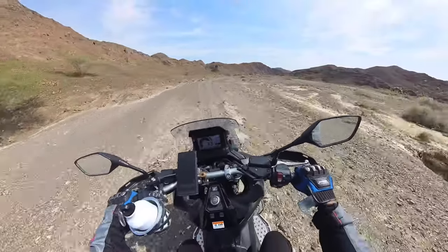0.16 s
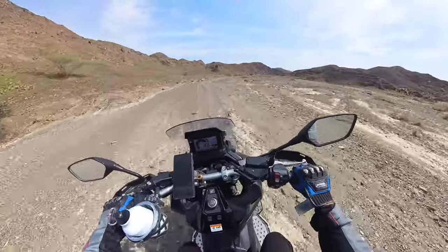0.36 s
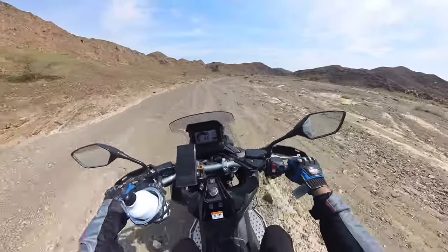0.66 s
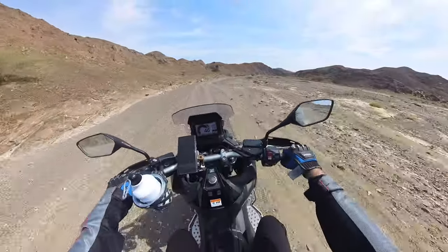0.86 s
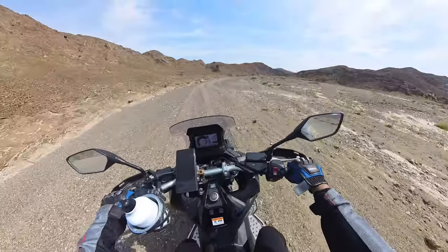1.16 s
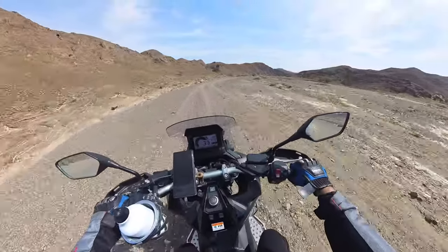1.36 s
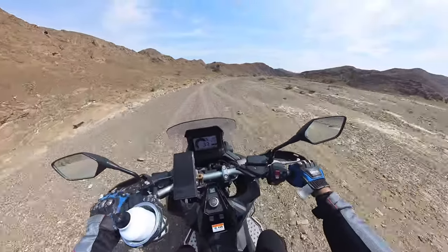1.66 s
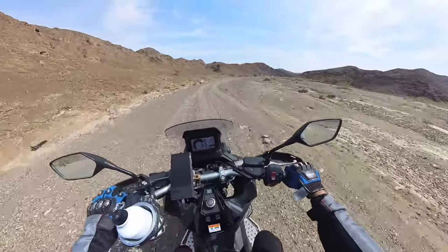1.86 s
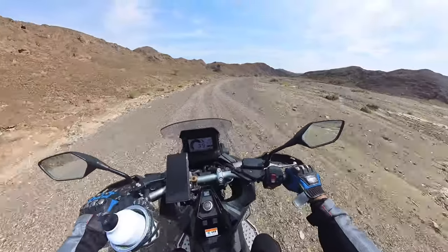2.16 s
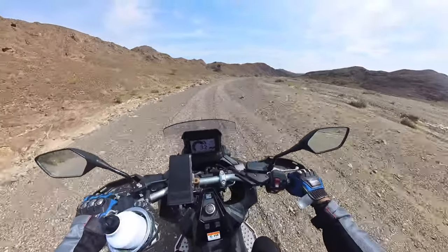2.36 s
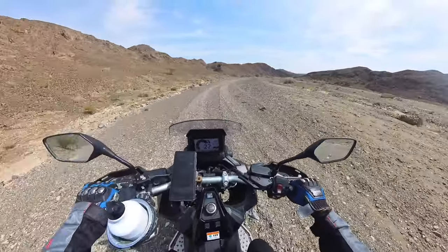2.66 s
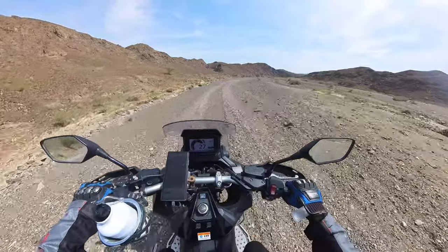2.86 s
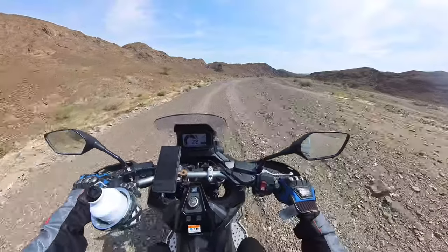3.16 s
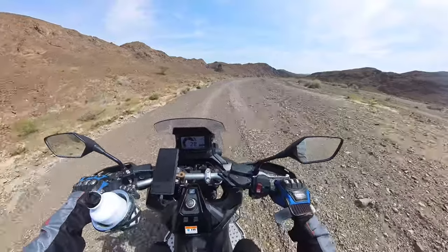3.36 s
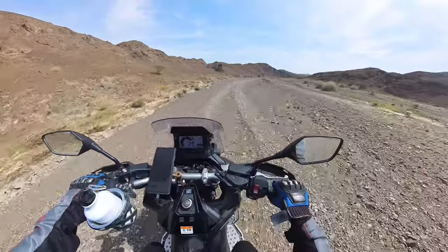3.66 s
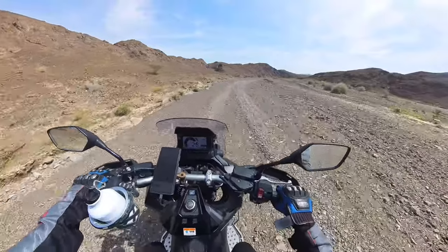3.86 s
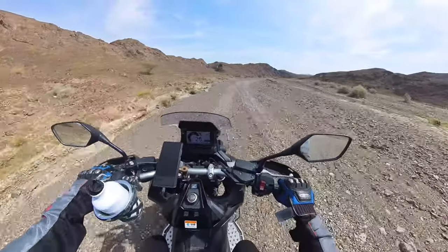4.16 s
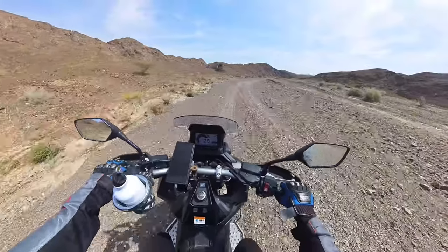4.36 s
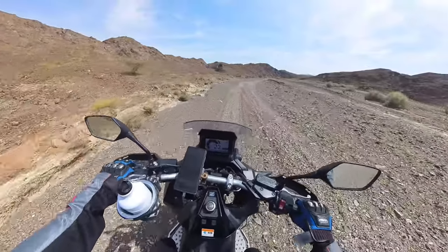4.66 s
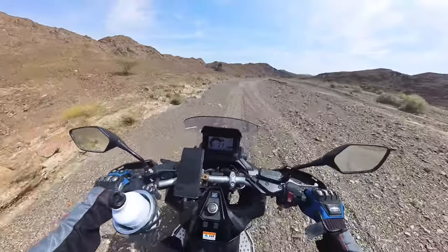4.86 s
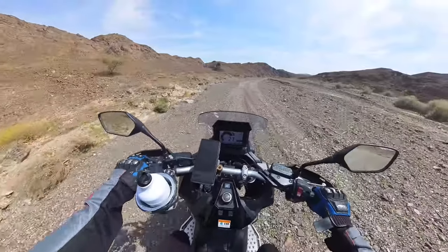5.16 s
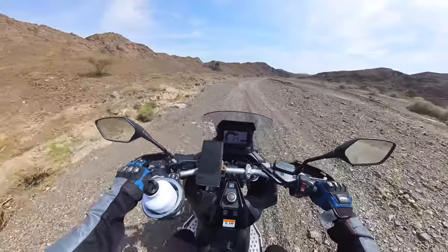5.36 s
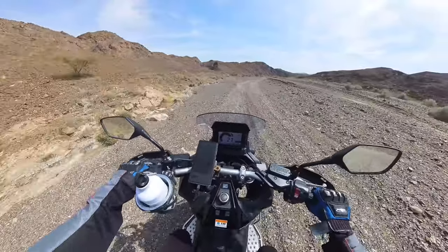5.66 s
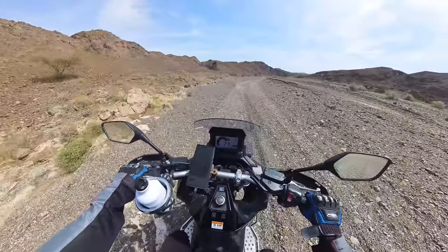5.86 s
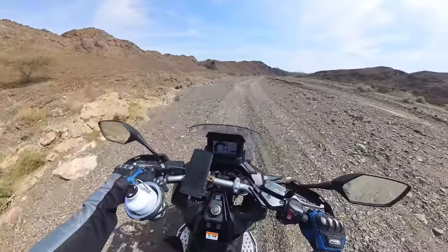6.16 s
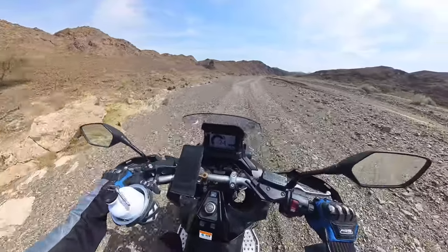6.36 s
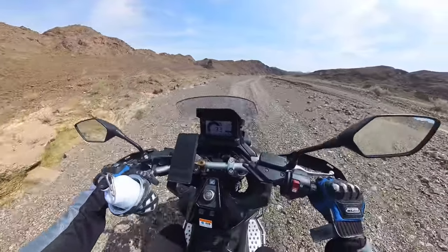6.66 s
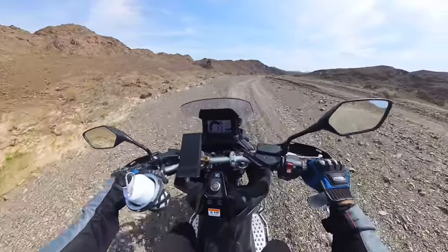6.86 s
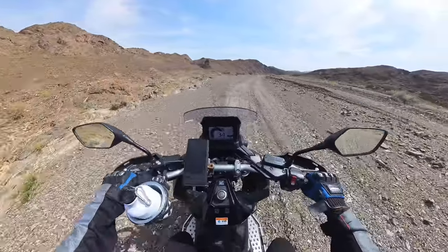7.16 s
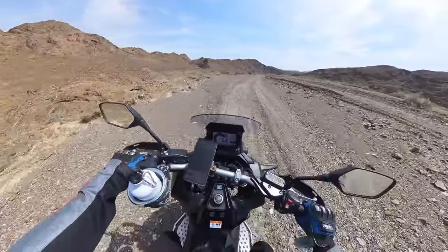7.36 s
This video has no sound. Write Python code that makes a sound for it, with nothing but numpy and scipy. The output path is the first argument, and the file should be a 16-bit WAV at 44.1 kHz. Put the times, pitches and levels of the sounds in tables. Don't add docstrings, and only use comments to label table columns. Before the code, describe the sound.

A steady chugging motorcycle engine jumps up in a short snappy surge, drops back, and gradually slows to a loping, near-idle throb while wind and tyre grind fade. A few small stones knock the underside. Then it revs again with a fuller exhaust ring, gravelly roar and chassis rattles, and slackens at the end. One close, dry outdoor microphone on the rider, bass-heavy and gently distorted.

```python
import sys
import numpy as np
from scipy import signal
from scipy.io import wavfile
from scipy.ndimage import uniform_filter1d

SR = 44100
rng = np.random.default_rng(int(sys.argv[2]) if len(sys.argv) > 2 else 0)


def log_audio(samples):
    frames = np.atleast_2d(samples).T
    limited = np.clip(frames, -1, 1)
    pcm = np.round(limited * 32767).astype(np.int16)
    wavfile.write(sys.argv[1], SR, pcm)


def gain_from_db(level_db):
    decades = np.asarray(level_db, float) / 20
    return 10 ** decades


N = 331191
LEAD = 4410
M = N + LEAD

# frequency [Hz], level [dB per Hz].
ROAR_COLOUR = [(60, -10), (150, -2), (300, 1), (450, 0), (600, -2), (800, -5), (1300, -7), (1600, -16),
               (2000, -25), (2600, -29), (4000, -42), (8000, -54), (16000, -80)]
# frequency [Hz], level [dB per Hz].
FLOOR = [(1500, -10), (3500, 1), (5000, -2), (7000, -3), (10000, -2), (11500, -11), (13500, -15),
         (16000, -19)]
# time [s], level [dB].
GUSTS = [
    (0, -23.5),
    (1, -24),
    (1.9, -27.5),
    (2.5, -28),
    (3.5, -32),
    (4.5, -35.5),
    (5.0, -35.5),
    (5.6, -35.5),
    (6.5, -37),
    (7.51, -30),
]
CRUISE_DB, CRUISE_SPEED = -25, 22
SECOND_FIRES = 270 / 720


def evened(x):
    return x / np.sqrt(np.mean(x ** 2) + 1e-20)


def curves(rows):
    s, *columns = np.transpose(rows)
    return [np.interp((np.arange(M) - LEAD) / SR, s, c) for c in columns]


def levelled(x, db, span_s=.13):
    span = int(span_s * SR)
    slow = uniform_filter1d(uniform_filter1d(x ** 2, span), span)
    return gain_from_db(db) * x / np.sqrt(abs(slow) + 1e-20)


def resonate(x, hz, width):
    turn = np.exp(2j * np.pi * np.cumsum(hz * np.ones(len(x))) / SR)

    def smooth(w):
        return signal.lfilter([1], [1, -np.exp(-np.pi * w / SR)], x / turn)

    if np.ndim(width) == 0:
        return (turn * smooth(width)).real
    lo, hi = np.min(width), np.max(width) + 1
    share = np.log(width / lo) / np.log(hi / lo)
    return (turn * ((1 - share) * smooth(lo) + share * smooth(hi))).real


def resonate_twice(x, hz, width):
    return resonate(resonate(x, hz, width), hz, width)


def coloured(points, patchy_db):
    frames, hz = M // 256 + 5, np.fft.rfftfreq(1024, 1 / SR)
    a, b, patches = rng.standard_normal((frames, 513, 3)).T
    patches = evened(uniform_filter1d(uniform_filter1d(patches, 10, axis=0), 8, axis=1))
    f, db = np.transpose(points)
    colour_db = np.interp(np.log(hz + 1), np.log(f), db)[:, None]
    z = (a + 1j * b) * gain_from_db(colour_db + patchy_db * patches)
    return evened(signal.istft(z, nperseg=1024, noverlap=768)[1][:M])


def bump(t, at_ms, width_ms):
    return np.exp(-((t * 1000 - at_ms) / width_ms) ** 2)


def shaped(pulses, at_ms, width_ms):
    t = np.arange(-1000, 1001) / SR
    return signal.oaconvolve(pulses, bump(t, at_ms, width_ms), "same")


def crank():
    # time [s], engine speed [cycles a second].
    speeds = [(0.0, 23.73), (0.38, 23.49), (0.5, 27.0), (0.76, 28.75), (0.778, 32.89), (0.883, 32.45),
              (1.008, 25.59), (1.37, 24.19), (1.838, 22.92), (2.299, 20.42), (2.508, 19.67), (2.696, 16.58),
              (2.873, 17.88), (3.234, 17.3), (3.449, 16.39), (3.628, 15.58), (3.853, 15.67), (3.998, 16.1),
              (4.49, 15.23), (4.67, 13.07), (4.9, 12.8), (5.061, 14.74), (5.2, 14.05), (5.648, 13.19),
              (6.013, 14.86), (6.363, 17.14), (6.5, 19.47), (6.796, 20.96), (7.109, 22.95), (7.51, 16.14)]
    speed, = curves(speeds)
    cycle = .213 + np.cumsum(speed) / SR
    first, second = (1 * (np.diff(np.floor(cycle - lag), prepend=0) > 0) for lag in (0, SECOND_FIRES))
    return speed, cycle, first, second


def firing():
    # time [s], firing strength [dB], gas jet at the outlet [dB], engine braking [0-1], pipe ring [Hz].
    throttle = [(0, -29, -74, 0.61, 109.3), (.45, -24.5, -66.5, 0.66, 121.2),
                (.51, -19.5, -49.5, 0.4, 113.3), (.74, -19.5, -43.5, 0.7, 126.5),
                (.78, -21.5, -42, 0.84, 103), (.89, -18.5, -43, 0.73, 103),
                (.95, -20.5, -58.5, 0.74, 125.4), (1.17, -26, -58.5, 0.78, 121.3),
                (1.24, -24.5, -55, 0.8, 119.5), (2.33, -26.5, -57, .75, 103), (2.5, -29, -60.5, 0.87, 96),
                (2.6, -34, -56.5, 1, 96.4), (3.0, -32.5, -60, .95, 91.3), (3.42, -31, -61.5, 0.88, 110),
                (3.7, -36.5, -79, 0.87, 91.3), (4.4, -31.5, -92, 0.66, 85.9), (4.8, -36, -85.5, 0.75, 106),
                (5.1, -32.5, -86, 0.75, 115), (5.72, -33, -79, 0.65, 113), (5.78, -25, -64.5, 0.36, 84.4),
                (6.1, -23.5, -63, 0.39, 91.3), (6.45, -17, -52.5, 0.21, 99.3),
                (7.08, -16.5, -47.5, 0.32, 113.1), (7.16, -16.5, -52.5, .29, 111.7),
                (7.25, -17.5, -60.5, 0.31, 111.8), (7.51, -24, -66, 0.49, 105)]
    # time [s], length
    # [s], loss [dB].
    stumbles = [(0.112, 0.043, -2.5), (1.069, 0.22, 6), (2.431, 0.034, 7), (2.636, 0.07, 4.5),
                (2.85, 0.05, 18.5), (3.251, 0.064, 8), (3.548, 0.087, 4), (3.97, 0.079, 5.5),
                (4.644, 0.36, 4.5), (5.39, 0.11, 5), (7.273, 0.17, 5)]
    t = (np.arange(M) - LEAD) / SR
    loss_db = sum(db * np.exp(-((t - s) / length) ** 2) for s, length, db in stumbles)
    return (loss_db, *curves(throttle))


def thumps(push, speed, slow):
    t = np.arange(-1000, 1001) / SR
    thump = 0
    for pulses, stretch, rise in ((push * (1 - slow), 1, .62), (push * slow, 1.6, .8)):
        swing = rise * bump(t / stretch, -3.2, 4.4) - 1.25 * bump(t / stretch, 3.8, 2.0)
        thump = thump + signal.oaconvolve(pulses, swing, "same")
    hum = 0.02 * resonate(thump, np.maximum(3 * speed, 67.4), 61)
    drone = .012 * np.clip((16 - speed) / 1.4, 0, 1) * resonate(thump, 78, 28)
    return thump + hum + drone


def pipe_ring(push, rear, ring_hz, pulling):
    width_hz, pull_width_hz, swell_width_hz, swell_db = 13.2, 8.3, 77, -2
    hits = push * gain_from_db(-0.5 * rear)
    ring = resonate(shaped(hits, -2.524, 1.16), ring_hz, width_hz + pull_width_hz * pulling)
    swell = np.roll(resonate_twice(hits, ring_hz, swell_width_hz), -round(0.0025 * SR))
    return (1 - pulling) * evened(ring) + pulling * gain_from_db(swell_db) * evened(swell)


def silencer_bark(push, rear, speed, idle, load, fire_db, jet_db, braking):
    # frequency [Hz], width [Hz], level [dB].
    modes = [
        (177.4, 53, 9),
        (260.2, 123, 11),
        (317.3, 10, -2.5),
    ]
    burble, burble_rise = 2.66, 0.21
    blip_hz, blip_db = 295.4, 4
    blast = levelled(shaped(push * gain_from_db(-4.5 * rear), -2.584, 0.86), 0)
    turbulence = rng.standard_normal(M) * (shaped(push, 4.9, 11) + 0.12)
    blast = blast + burble * idle * 6 * evened(turbulence)

    opening = np.clip((jet_db + 63) / 15.5, 0, 1)
    shut, wide_open = 13, 15.73
    growl_hz = np.maximum(speed * (shut + (wide_open - shut) * opening), 264)
    last_firing = np.maximum.accumulate(np.arange(M) * (push > 0))
    since_s = (np.arange(M) - last_firing) / SR
    growl_hz = growl_hz * (1 + burble_rise * idle * (np.minimum(since_s / .025, 1) - .5))
    blip = np.clip((fire_db - CRUISE_DB) / 4, 0, 1) * np.clip((braking - .3) / .2, 0, 1)
    growl_hz = growl_hz + blip * (blip_hz - growl_hz)
    growl_db = 2.5 - 12.5 * load + blip_db * blip + 9 * opening * braking

    bark = gain_from_db(growl_db) * evened(resonate_twice(blast, growl_hz, 53))
    for hz, width, db in modes:
        bark = bark + gain_from_db(db) * evened(resonate_twice(blast, hz, width))
    return signal.sosfilt(signal.butter(2, 150, "high", fs=SR, output="sos"), bark)


def outlet_hiss(puff, load, pulling):
    # frequency [Hz], level [dB per Hz].
    jet_colour = [(300, 17.5), (800, 10.5), (1500, 2.5), (2500, -1), (3200, -7.5), (4200, -11),
                  (5500, -9.5), (6700, -14), (8600, -12), (10000, -16), (11500, -24), (15500, -37)]
    # frequency [Hz], level [dB per Hz].
    sizzle_colour = [(300, 0.5), (700, 22), (1300, 34.5), (2500, -10.5), (6000, -13), (10000, -18.5),
                     (12500, -1), (15500, -3.5)]
    sizzle_db, rasp = 1.5, 0.26
    sharp = np.clip(load + pulling, 0, 1)
    soft_puff, hard_puff = puff * (1 - sharp), puff * sharp
    sigh = shaped(soft_puff, -.3, 2.7) + .11 * shaped(soft_puff, 3, 5)
    snap = 1.5 * shaped(hard_puff, -.2, 1.3) + .32 * shaped(hard_puff, 4.6, .6) + .1 * shaped(hard_puff, 4.5, 6.5)
    sizzle = coloured(sizzle_colour, patchy_db=2.5)
    jet = coloured(jet_colour, patchy_db=0.0) + load ** 2 * gain_from_db(sizzle_db) * sizzle
    return jet * (sigh + snap + 0.036 + rasp * load)


def valve_gear(push, cycle):
    tick_db, seat_db, seat_hz, seat_width_hz = -90, -87.5, 9800, 2500
    seat_lag = .14
    ticks = coloured(FLOOR, patchy_db=1.5) * shaped(push, 0, 2.2)
    seats = sum(np.diff(np.floor(cycle - lag - seat_lag), prepend=0) > 0 for lag in (0, SECOND_FIRES)) + push
    clicks = resonate_twice(rng.standard_normal(M), seat_hz, seat_width_hz) * shaped(seats, 0, 1.2)
    return gain_from_db(tick_db) * evened(ticks) + gain_from_db(seat_db) * evened(clicks)


def engine():
    speed, cycle, first, second = crank()
    loss_db, fire_db, jet_db, braking, ring_hz = firing()
    pulling = np.clip(1 - braking / .6, 0, 1)
    load = np.clip((jet_db + 61) / 30, 0, 1)
    slow = np.clip((22 - speed) / 8, 0, 1)
    lumpy = np.clip((21 - speed) / 3, 0, 1) * np.clip(1 - 3 * pulling, 0, 1)
    uneven_db = .7 + .9 * lumpy + 1.6 * load

    thump_db = fire_db - 19 + 31 * braking - 0.32 * loss_db
    ring_db, hiss_db = fire_db - loss_db, jet_db - loss_db
    bark_db = -31 + 1.61 * (fire_db - 0.52 * loss_db - CRUISE_DB) + 0.24 * (speed - CRUISE_SPEED)
    second_db = -2.5 - .25 * (speed - CRUISE_SPEED) + 4.5 * pulling + 3.5 * load * (1 - pulling)

    at = np.r_[0, np.flatnonzero(first | second)]
    strength_luck, puff_luck, time_luck = rng.standard_normal((3, len(at)))
    late = np.round(.00015 * SR * uneven_db[at] * time_luck).astype(int)
    at_late = np.clip(at + late, 0, M - 1)
    push, puff, rear = np.zeros((3, M))
    push[at_late] = gain_from_db(uneven_db[at] * strength_luck)
    rear[at_late] = second[at]
    puff[at_late] = gain_from_db(second_db[at] * second[at] + 3 * (1 - 0.37 * load[at]) * puff_luck)

    thump = thumps(push, speed, slow)
    ring = pipe_ring(push, rear, ring_hz, pulling)
    bark = silencer_bark(push, rear, speed, slow * (1 - pulling), load, fire_db, jet_db, braking)
    hiss = outlet_hiss(puff, load, pulling)
    chuff = coloured(ROAR_COLOUR, patchy_db=3) * shaped(puff, .2, 1.6)
    return (levelled(thump, thump_db - .6)
            + levelled(ring, ring_db + 3.0)
            + levelled(bark, bark_db - 13.5 * pulling)
            + levelled(hiss, hiss_db + 10.5)
            + np.sqrt(pulling) * levelled(chuff, ring_db - 25)
            + valve_gear(push, cycle))


def scattered(per_s):
    return gain_from_db(4 * np.minimum(rng.exponential(1, M), 4)) * (rng.random(M) < per_s / SR)


def gravel():
    # frequency [Hz], width [Hz], level [dB].
    panels = [
        (718, 36, -2),
        (1330, 60, -9),
        (2450, 220, -25),
        (3500, 400, -33),
    ]
    tyres_db = -52 + 0.45 * (curves(GUSTS)[0] - GUSTS[0][1])
    gears_db = -57.5 + 1.41 * (firing()[1] - CRUISE_DB)
    level_db = 20 * np.log10(np.hypot(gain_from_db(tyres_db), gain_from_db(gears_db)))
    crunch = signal.oaconvolve(scattered(200), bump(np.arange(900) / SR, 10, 3.6))[:M]
    roar = coloured(ROAR_COLOUR, patchy_db=1.0) * (1 + 0.53 * evened(crunch))
    white = rng.standard_normal(M)
    hum = sum(gain_from_db(db) * evened(resonate_twice(white, hz, width)) for hz, width, db in panels)
    flicks = signal.oaconvolve(scattered(70), bump(np.arange(300) / SR, 3, 1))[:M]
    grit = evened(coloured(FLOOR, patchy_db=1) * flicks)
    return gain_from_db(level_db + 4.5) * evened(roar) + gain_from_db(level_db - 5.5) * hum + gain_from_db(-87) * grit


def wind():
    # frequency [Hz], level [dB per Hz].
    buffet_colour = [(12, -6), (25, 3), (45, -8), (90, -14), (200, -20), (400, -38), (1200, -120)]
    return gain_from_db(curves(GUSTS)[0]) * coloured(buffet_colour, patchy_db=1.2)


def intake_air():
    return gain_from_db(-78 + 0.7 * (firing()[1] - CRUISE_DB)) * coloured(FLOOR, patchy_db=2)


def stones_and_pops():
    # time [s], peak [dB], ring [Hz], tick [dB].
    hits = [(0.271, -29.5, 696, -74), (1.773, -49.5, 520, -53), (3.781, -51.5, 2150, -53),
            (4.19, -49, 713, -61.5), (4.783, -52.5, 666, -63.5), (4.836, -60, 517, -59.5),
            (4.944, -44.5, 686, -86), (5.047, -42, 677, -58.5), (7.269, -29.5, 1215, -73),
            (3.59, -53, 1870, -57), (3.657, -56.5, 2020, -57.5)]
    out, t = np.zeros(M + 2000), np.arange(2000) / SR
    dull = signal.butter(5, 10000, fs=SR, output="sos")
    for s, db, hz, tick_db in hits:
        ring = gain_from_db(db - 60 * t / 0.02) * np.sin(2 * np.pi * hz * t)
        grit = signal.sosfilt(dull, .9 * rng.standard_normal(len(t)))
        out[round(s * SR) + LEAD:][:len(t)] += ring + gain_from_db(tick_db - 2) * bump(t, 1.4, 3.9) * grit
    return out[:M]


def knocks():
    # time [s], peak [dB], ring [Hz].
    hard_firings = [(0.587, -26, 680), (0.661, -23, 773), (0.694, -33, 729), (0.741, -36, 710),
                    (0.764, -34, 813), (0.855, -25.5, 653), (2.081, -35.5, 684), (5.912, -31.5, 637),
                    (6.052, -29.5, 890), (6.114, -29, 807), (6.179, -29, 713), (6.24, -30, 1030),
                    (6.418, -25.5, 770), (6.471, -24.5, 1413), (6.436, -21.5, 670), (6.488, -18.5, 837),
                    (6.691, -25, 773), (6.739, -28.5, 1084), (6.784, -21, 860), (6.833, -23, 1050),
                    (6.882, -28.5, 662), (6.929, -31, 680), (7.046, -21, 812)]
    t60_s, width_hz, early_s = 0.016, 1400, .001
    out, t = np.zeros(M + 2000), np.arange(2000) / SR
    fired = np.flatnonzero(sum(crank()[2:]))
    for s, db, hz in hard_firings:
        nearest = fired[np.argmin(abs(fired - LEAD - s * SR))]
        at = nearest - round(early_s * SR)
        rattle = evened(resonate_twice(rng.standard_normal(len(t)), hz, width_hz))
        out[at:][:len(t)] += np.minimum(t * 2000, 1) * gain_from_db(db - 5.5 - 60 * t / t60_s) * rattle
    return out[:M]


def scene():
    return (engine() + gravel() + wind() + intake_air() + stones_and_pops() + knocks())[None, LEAD:]


def band_limit(x):
    return signal.sosfilt(signal.butter(12, 15850, fs=SR, output="sos"), x)


def record(dry):
    ceiling, knee = .24, 3.6
    bent = dry / (1 + abs(dry / ceiling) ** knee) ** (1 / knee)
    centred = bent - bent.mean() + .0017
    noisy = centred + gain_from_db(-85.5) * coloured(FLOOR, patchy_db=-1.0)[:N]
    return band_limit(noisy)


dry = scene()
out = record(dry)
log_audio(out)
```